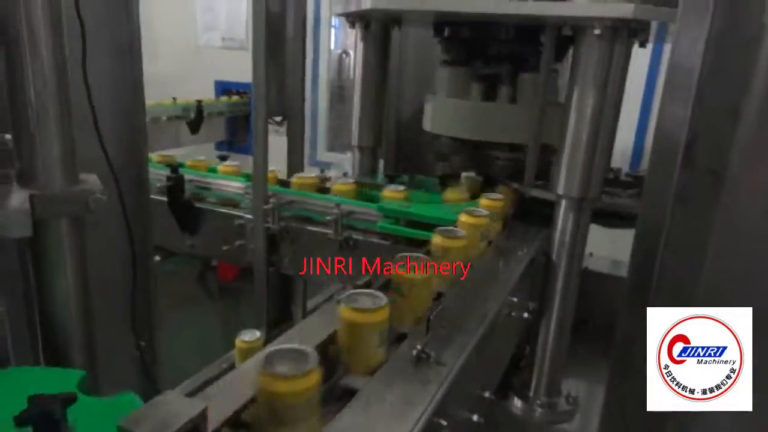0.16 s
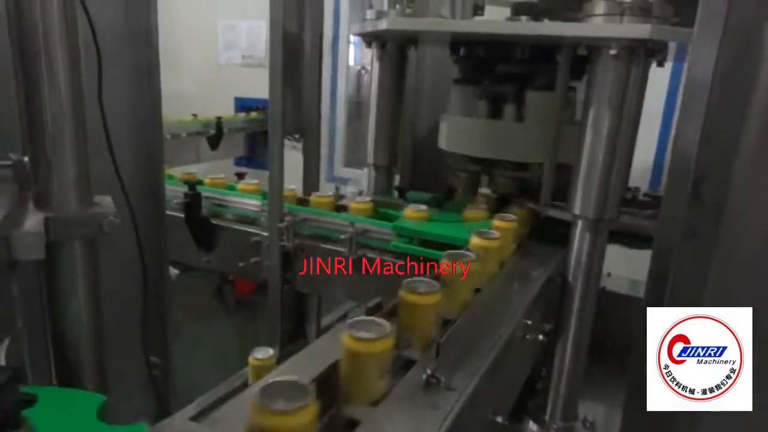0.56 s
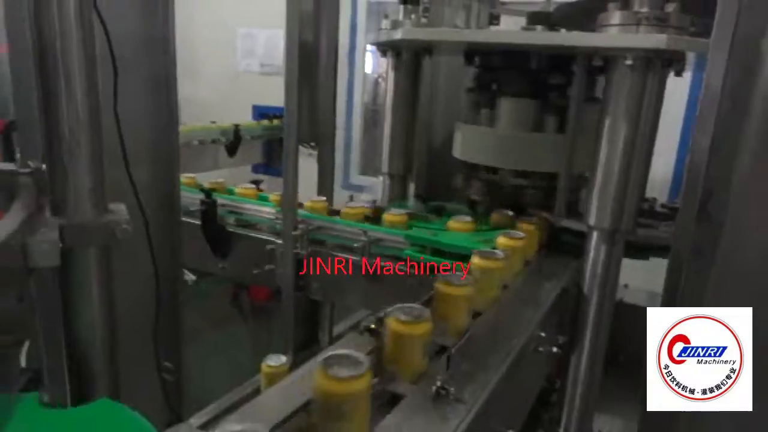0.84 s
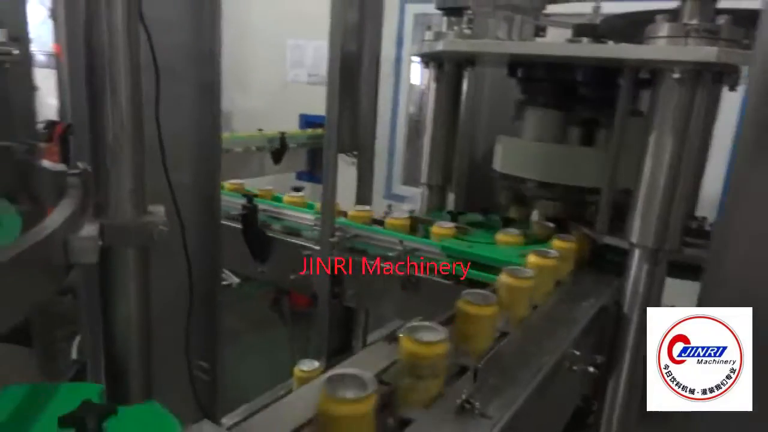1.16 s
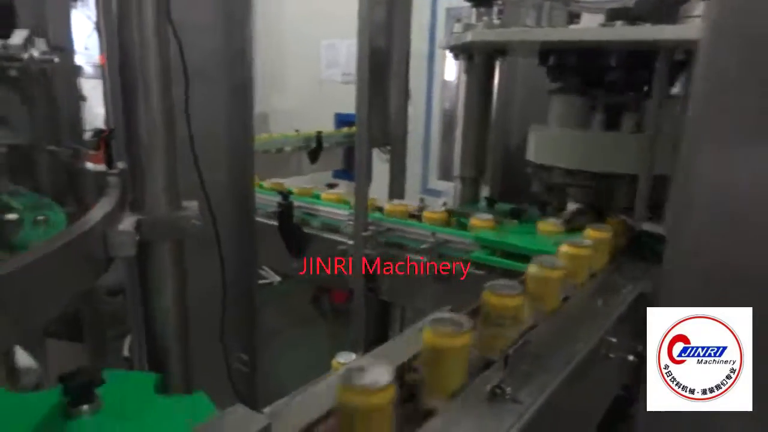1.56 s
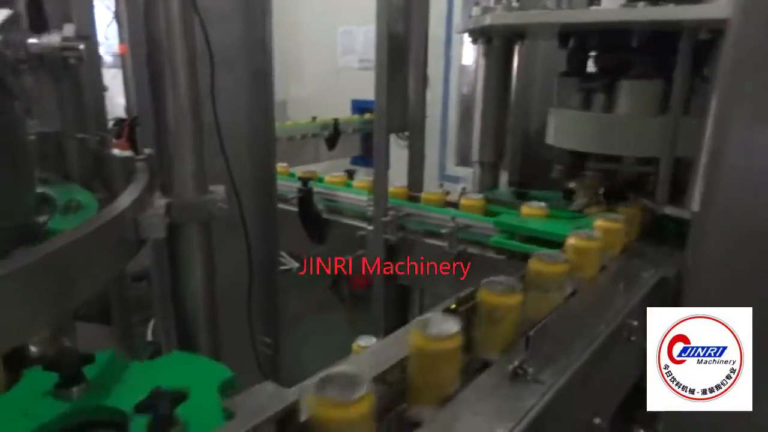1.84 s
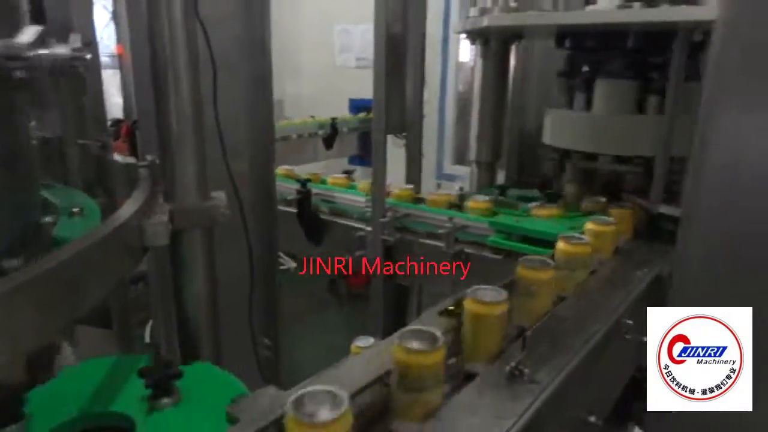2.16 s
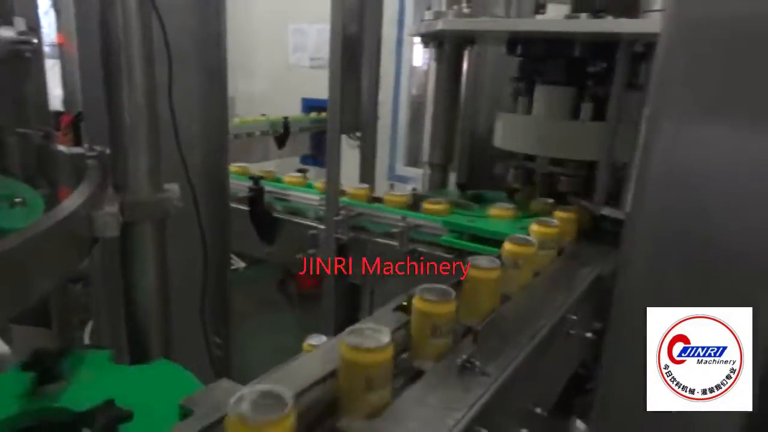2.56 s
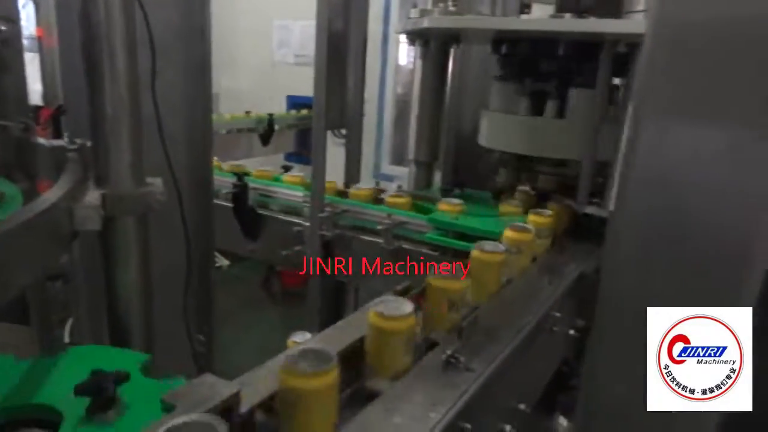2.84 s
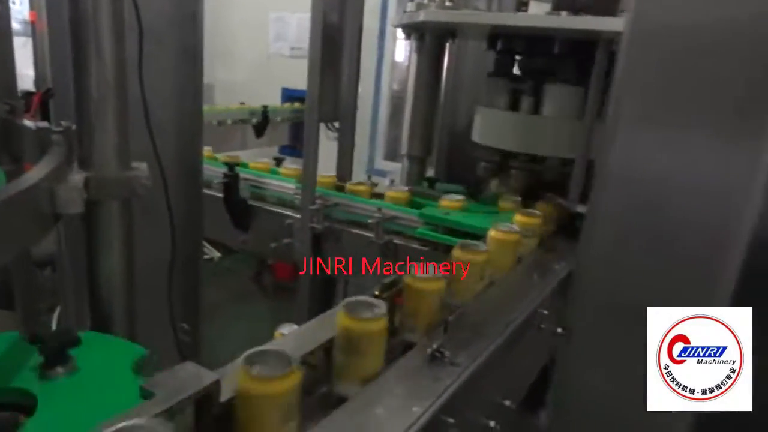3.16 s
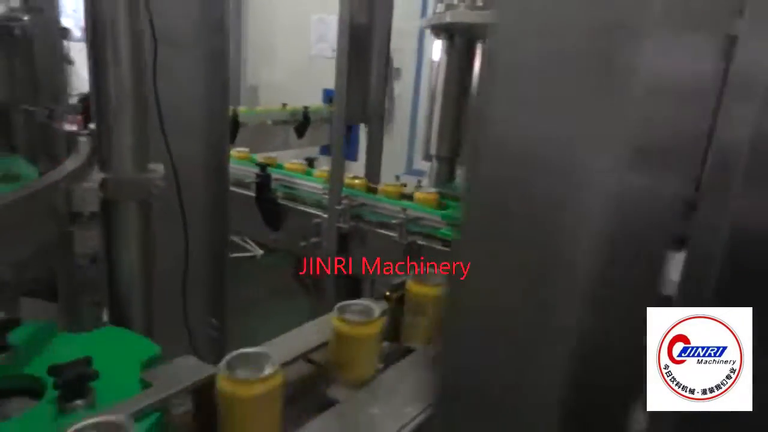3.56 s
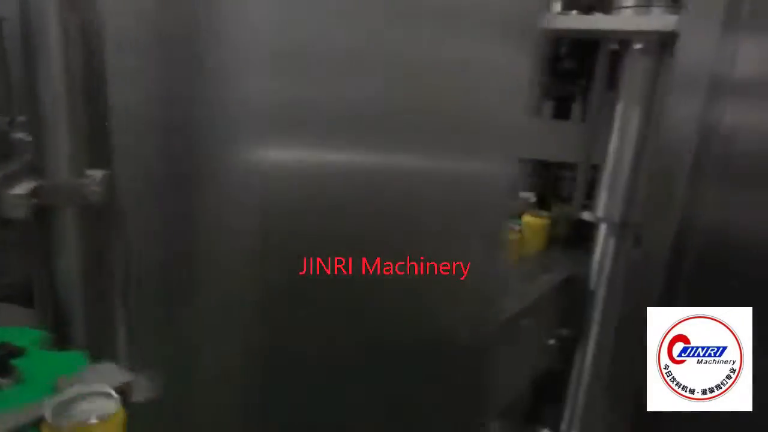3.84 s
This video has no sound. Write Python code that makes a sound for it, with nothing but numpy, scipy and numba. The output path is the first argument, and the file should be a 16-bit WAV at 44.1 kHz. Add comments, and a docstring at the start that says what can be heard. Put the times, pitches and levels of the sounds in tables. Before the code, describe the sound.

An air jet hisses in quick, regular surges, about two a second, as cans pass along a factory line. Behind it, motors and belts roar steadily and the cans rattle and knock against the guides.

```python
"""An air jet blasts each passing can on a factory line: a hiss that swells and dies, with hollow tones
that slide down as the can moves under the nozzle and others that hold their pitch. Behind it, cans
knock and rattle against the guides, and motors and belts roar steadily. An automatic gain control
ducks that background during every blast."""
import sys
import numpy as np
from scipy import signal
from scipy.io import wavfile
from scipy.ndimage import uniform_filter1d
from numba import njit

SR = 44100
rng = np.random.default_rng(int(sys.argv[2]) if len(sys.argv) > 2 else 0)


def master(y):
    """Save y as 16-bit WAV."""
    cut = np.clip(np.atleast_2d(y).T, -1, 1)
    pcm = np.round(cut * 32767)  # scale
    wavfile.write(sys.argv[1], SR, pcm.astype(np.int16))


N = 176400


def air_jet():
    """A valve opens for each can; the air flow drives a hiss and two sets of tones."""
    # One blast per can: (start [s], level [dB], length [ratio], sliding pitch [ratio], hiss tilt [dB/octave],
    # low, middle and high sliding tone trims [dB], standing tone trim [dB])
    blasts = [(-.245, -1.3, 0.93, 0.98, 0.033, .1, -10, .1, 5.5),
              (.199, 1, 0.9, 1.01, 0.033, 3.5, 5.5, -2, 4.8),
              (0.667, -1.1, 0.8, 0.98, 0.14, 6.5, -10, -7, -6),
              (1.097, -0.68, 0.93, 0.95, .1, 5, -1, -11, 3.5),
              (1.537, -1.7, 0.99, 0.99, 0.071, 4.5, 6.5, -1, 6),
              (1.992, -0.38, 0.92, 0.98, 0.12, 5.3, 3, -8, 5),
              (2.434, -0.38, 0.96, 1.01, 0.11, 6, 4, -5, 4.2),
              (2.911, -0.34, .95, 0.89, 0.13, 3.5, -15, 2, 1.5),
              (3.335, -0.4, 0.95, 0.96, 0.14, 3.5, 3, 2.1, 3), (3.784, .1, 1.01, .98, -0.2, 2, 0, -1, 3.5)]
    # Flow envelope of a blast of length 1: (time since the valve opened [s], level [dB])
    envelope = [(0, -23), (.006, -16.5), (.02, -13.5), (.05, -10.5), (.1, -10), (.15, -8.5), (.19, -10.5),
                (.22, -13.5), (.3, -16.5), (.33, -17.5), (.37, -21), (.44, -26), (.6, -55)]
    start, db, length, pitch, tilt, *sliding_db, standing_db = np.transpose(blasts)
    t = np.arange(N) / SR
    now = np.searchsorted(start, t) - 1   # the current blast at each sample
    age = (t - start[now]) / length[now]   # each blast's clock, stretched by its length
    previous_age = (t - start[now - 1]) / length[now - 1]
    flow = amp(np.interp(age, *np.transpose(envelope)) + db[now])
    tail = amp(np.interp(previous_age, *np.transpose(envelope)) + db[now - 1]) * (now > 0)
    total_flow = np.hypot(flow, tail)
    full_flow_db = -11
    width_db = -5.2 + (20 * np.log10(total_flow) - full_flow_db)   # more air, wider image
    hiss = jet_hiss(age, tilt[now], width_db)
    sliding = sliding_tones(age, pitch[now], [trim[now] for trim in sliding_db], width_db)
    standing = standing_tones(age, standing_db[now], width_db)
    return total_flow * hiss + flow * (sliding + standing)


def jet_hiss(age, tilt, width_db):
    """Rushing air starts hollow, brightens, and loses its treble first as the valve shuts."""
    # Base colour of the hiss: (frequency [Hz], relative density [dB])
    spectrum = [(1000, -30), (1800, -9), (2500, -2), (3500, -5), (4300, -2), (5500, -6.5), (8000, -8),
                (11000, -6.5), (13000, -8), (15500, -8.5)]
    # A sheen climbing through the hiss: (blast age [s], centre [Hz])
    sheen_path = [(0, 4700), (.04, 5600), (.08, 7200), (.13, 7600), (.19, 9400), (.3, 10000)]
    sheen_hz = np.interp(age, *np.transpose(sheen_path))
    smooth_tilt = uniform_filter1d(tilt, size=2000)
    scoop_db = 5 * np.exp(-age / .04)
    dull_db_per_octave = uniform_filter1d(38 * np.maximum(age - .27, 0), size=1500)

    def bell(hz, centre_hz, octaves=.25):
        return np.exp(-.5 * (np.log2(hz / centre_hz) / octaves) ** 2)

    def colour_db(hz):
        octaves = np.log2(hz / 5000)
        sheen = 3.5 * bell(hz, sheen_hz)
        scoop = scoop_db * bell(hz, centre_hz=7000)
        dulling = dull_db_per_octave * max(octaves, 0)
        return sheen + smooth_tilt * octaves - dulling - scoop
    hiss = banded_noise(spectrum, first_hz=1105, colour_db=colour_db, flicker_db=2.06, width_db=width_db)
    return low_cut(hiss, hz=2220)


def sliding_tones(age, pitch, trims_db, width_db):
    """Hollow tones glide down and fade as the can moves under the nozzle."""
    # Glides before each blast's tuning, stretch and trim: (from [Hz], toward [Hz],
    # glide time constant [s], bandwidth [Hz], level against the flow [dB], fade [dB/s])
    glides = [(1470, 1250, .1, 90, -6, 110), (3330, 2750, .06, 90, -10, 60),
              (4720, 4350, .06, 100, -4, 110)]
    out = 0
    for (first, last, glide, bandwidth, db, fade), trim_db in zip(glides, trims_db):
        hz = pitch * (last + (first - last) * np.exp(-age / glide))
        out += amp(db + trim_db - fade * age) * steadied(tone_noise(hz, bandwidth, width_db))
    return out


def standing_tones(age, trim_db, width_db):
    """Breathy tones hold their pitch, each swelling at its own point in the blast."""
    # Tones before each blast's stretch and trim: (pitch [Hz], bandwidth [Hz],
    # level against the flow [dB], crest at blast age [s], rise and fall [dB/s])
    tones = [(4236, 62, -13, 0.13, 23), (3890, 140, -15, 0.22, 32), (4570, 93, -19.5, 0.27, 23),
             (5500, 400, -9, 0.12, 99), (2393, 23, -15, 0.45, 24), (7550, 180, -22.5, 0.17, 75),
             (10750, 140, -23, 0.22, 38)]
    out = 0
    for hz, bandwidth, db, crest, slope in tones:
        swell_db = db + trim_db - slope * np.abs(age - crest) + drift(8)
        out += amp(swell_db) * tone_noise(np.full(N, hz, float), bandwidth, width_db)
    return out


def cans(rattles_per_s=60, rattle_db=-42):
    """Cans hit the guides: a few clear knocks over a random rattle."""
    # Knocks against the guides: (time [s], strike level [dB])
    knocks = [(.115, -26), (.51, -31), (.991, -24.5), (1.886, -30), (1.971, -24), (2.416, -28),
              (2.836, -27), (3.304, -30.5)]
    hits = rng.random(N) < rattles_per_s / SR
    accent_db = 3 * np.minimum(rng.exponential(1, N), 4)
    clicks = hits * amp(rattle_db + accent_db) * rng.choice([-1, 1], N)
    for time, db in knocks:
        clicks[int(time * SR)] = amp(db)
    return ring_can(clicks)


def ring_can(clicks):
    """Every click rings the can's modes in a slightly different balance."""
    # Modes of a can: (frequency [Hz], gain [dB], time to decay by 60 dB [s])
    modes = [(649, 10.8, 0.098), (950, -14, 0.01), (2018, 7.5, 0.065), (3060, -29, .02), (6500, 9, 0.019),
             (9370, 4.5, 0.042)]
    out = 0
    for hz, db, t60 in modes:
        r, w = amp(-60 / (t60 * SR)), 2 * np.pi * hz / SR
        strikes = clicks * amp(db + rng.normal(0, 2.65, N)) + 1e-18
        out += signal.lfilter([0, np.sin(w)], [1, -2 * r * np.cos(w), r * r], strikes)
    return out


def machinery(roar_db=-20.5, width_db=-7):
    """Motors and belts lay down a steady roar, and the machine frame rings within it."""
    # Colour of the roar: (frequency [Hz], relative density [dB])
    spectrum = [(15, -60), (25, -22.5), (178, -5.5), (399, -3.5), (614, -1), (1020, -5.5), (2010, -6.5),
                (3830, -11), (4150, -13), (5280, -13.5), (9050, -15), (13900, -19.5), (15500, -47)]
    # Frame resonances: (frequency [Hz], bandwidth [Hz], level [dB])
    frame = [(203.5, 3.8, -42.5), (367, 27, -36), (518, 69, -31.5), (597, 39, -28.5), (4320, 81, -42.5),
             (9330, 440, -37.5)]
    roar = banded_noise(spectrum, first_hz=39.52, colour_db=lambda hz: 0, flicker_db=2.1,
                        width_db=width_db)
    out = amp(roar_db) * roar
    for hz, bandwidth, db in frame:
        out += amp(db + 1.8 * drift(13)) * tone_noise(np.full(N, hz, float), bandwidth, width_db)
    return out


def banded_noise(spectrum, first_hz, colour_db, flicker_db, width_db):
    """Quarter-octave bands of stereo noise, each flickering on its own, shaded by colour_db."""
    edges = first_hz * 2 ** np.arange(0, np.log2(19000 / first_hz), 1 / 4)
    white = rng.standard_normal((2, 2, N))
    out, power = 0, 0
    for k, (low, high) in enumerate(zip(edges, edges[1:])):
        band = signal.butter(2, [low, high], "band", fs=SR, output="sos")
        mid, side = signal.sosfilt(band, white[k % 2])
        hz = np.sqrt(low * high)
        base_db = at_hz(spectrum, hz)
        power += amp(base_db) ** 2 * np.mean(mid ** 2)
        out += amp(base_db + colour_db(hz) + flicker_db * drift(10.5)) * spread(mid, side, hz, width_db)
    return out / np.sqrt(power)


def tone_noise(hz, bandwidth, width_db):
    """A stereo band of noise ringing around hz."""
    mid, side = [rms_one(resonate(rng.standard_normal(N), hz, bandwidth, SR)) for _ in range(2)]
    return spread(mid, side, np.mean(hz), width_db)


@njit
def resonate(x, hz, bandwidth, sr):
    """A two-pole resonance whose centre can glide."""
    y, r = np.zeros(len(x)), np.exp(-np.pi * bandwidth / sr)
    for i in range(2, len(x)):
        y[i] = x[i] - x[i - 2] + 2 * r * np.cos(2 * np.pi * hz[i] / sr) * y[i - 1] - r * r * y[i - 2]
    return y


def steadied(x):
    """A strongly driven hollow holds its loudness instead of fluttering like free noise."""
    return x / np.sqrt(uniform_filter1d(np.mean(x ** 2, axis=0), size=300) + .15)


def spread(mid, side, hz, width_db):
    """Mid and side noise become a stereo image that leans slightly left."""
    # Stereo width before width_db is added: (frequency [Hz], side against mid [dB])
    width = [(60, -42), (180, -63), (300, -78), (600, -13.5), (1200, -11.5), (2400, -10.5), (4400, -3),
             (6500, -12), (9000, -6), (11500, -29), (13000, -41), (15000, -47)]
    # Balance: (frequency [Hz], left over right [dB])
    lean = [(250, 0), (500, .4), (1000, .9), (5000, 1), (8000, .4), (12000, 0)]
    signs = np.array([[1], [-1]])
    stereo = mid + amp(at_hz(width, hz) + width_db) * side * signs
    return stereo * amp(at_hz(lean, hz) / 2 * signs)


def drift(rate_hz):
    """Slow random wander of unit spread."""
    step = 40   # samples between control points
    r = np.exp(-2 * step * np.pi * rate_hz / SR)
    slow = signal.lfilter([1], [1, -2 * r, r * r], rng.standard_normal(N // step + 2002))[2000:]
    return np.interp(np.arange(N) / step, np.arange(len(slow)), rms_one(slow - slow.mean()))


def low_cut(x, hz):
    """Roll off the lows at 12 dB per octave."""
    return signal.sosfilt(signal.butter(2, hz, "high", fs=SR, output="sos"), x)


def at_hz(points, hz):
    """Read a curve on a log-frequency axis."""
    frequencies, values = np.transpose(points)
    return np.interp(np.log(hz), np.log(frequencies), values)


def amp(db):
    """Decibels to gain."""
    return 10 ** (np.asarray(db) / 20)


def rms_one(x):
    """Scale to unit rms."""
    return x / np.sqrt(np.mean(x ** 2) + 1e-20)


def scene():
    """The jet over a bed of machinery and cans."""
    return air_jet() + machinery() + cans()


def record(dry):
    """Gain control ducks the whole mix when it rises over the knee; lows and extreme top are cut."""
    knee_db, squeeze, sense_s, release_db_per_s = -19.5, .86, .011, 144
    sidechain_top_hz, cutoff_hz = 8000, 15500
    dry = low_cut(dry, hz=69)
    sidechain = signal.sosfilt(signal.butter(2, sidechain_top_hz, fs=SR, output="sos"), dry)
    r = np.exp(-1 / (sense_s * SR))
    power, _ = signal.lfilter([1 - r], [1, -r], np.mean(sidechain ** 2, axis=0), zi=[.01])
    level_db = 10 * np.log10(power + 1e-12)
    ramp = release_db_per_s * np.arange(N) / SR
    held_db = np.maximum.accumulate(level_db + ramp) - ramp   # falls no faster than the release
    gain = amp(-squeeze * np.maximum(held_db - knee_db, 0))
    return signal.sosfilt(signal.ellip(12, .3, 80, cutoff_hz, fs=SR, output="sos"), dry * gain)


dry = scene()
out = record(dry)
master(out)
```